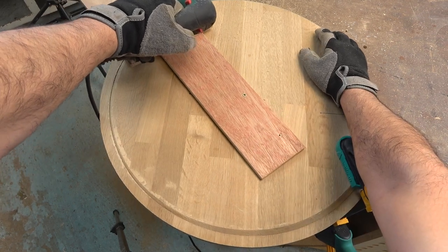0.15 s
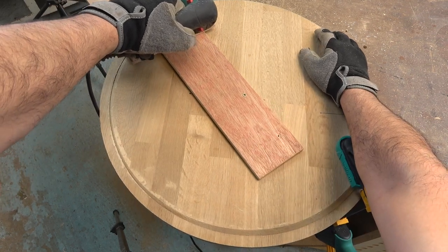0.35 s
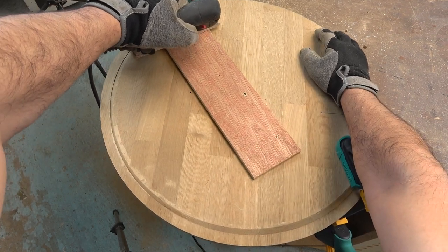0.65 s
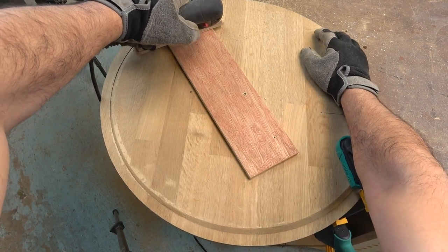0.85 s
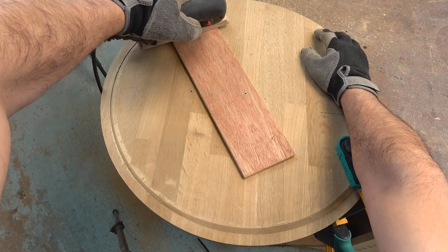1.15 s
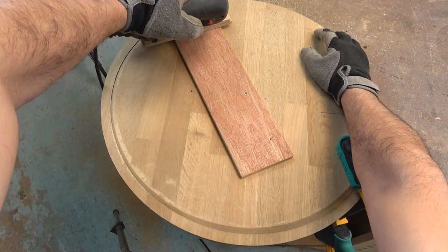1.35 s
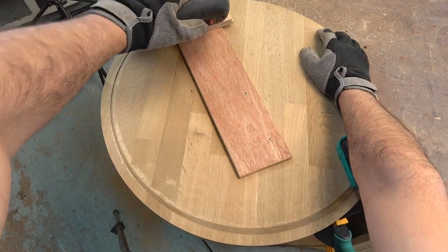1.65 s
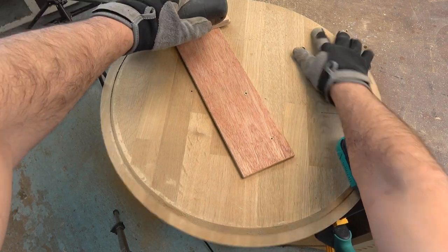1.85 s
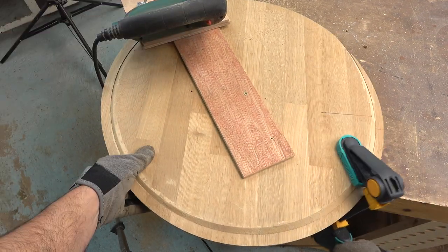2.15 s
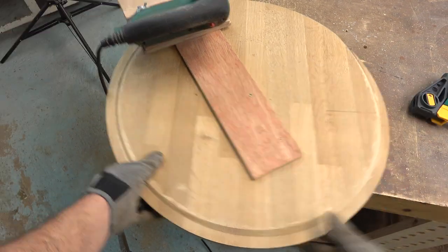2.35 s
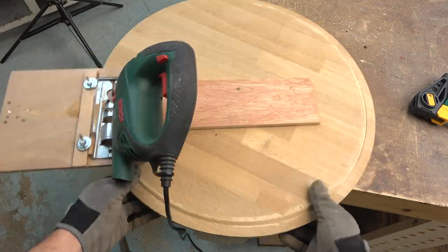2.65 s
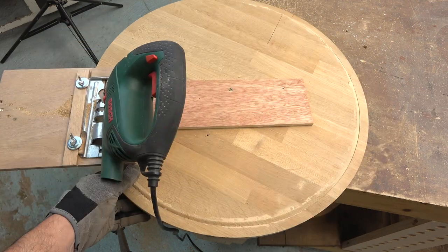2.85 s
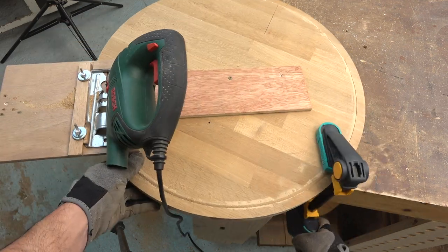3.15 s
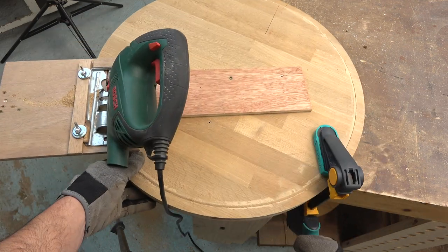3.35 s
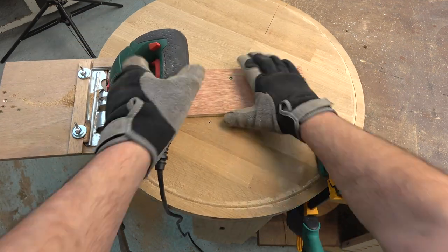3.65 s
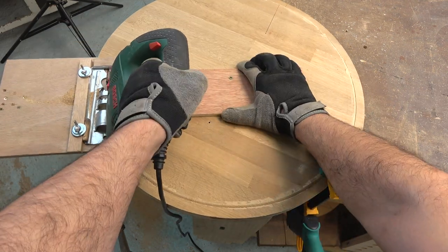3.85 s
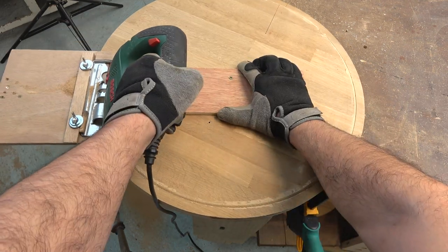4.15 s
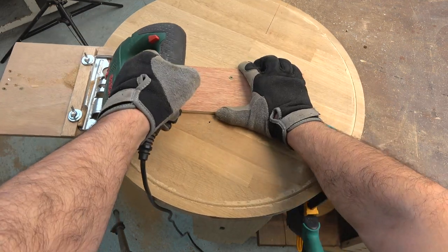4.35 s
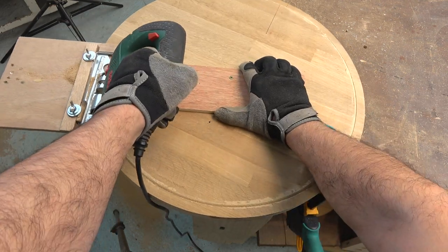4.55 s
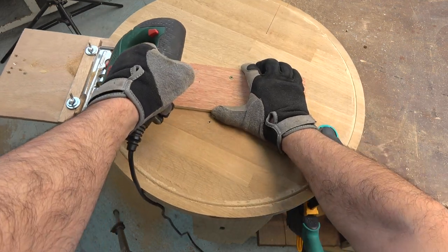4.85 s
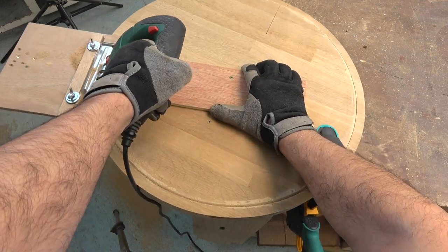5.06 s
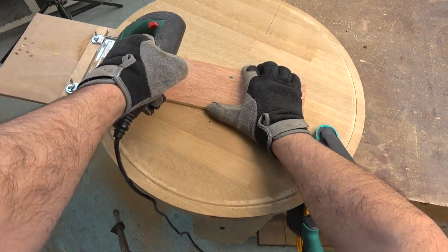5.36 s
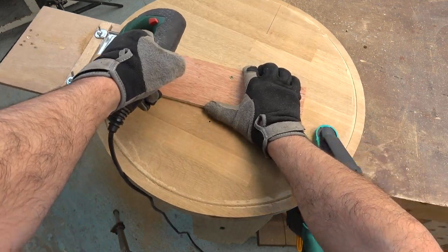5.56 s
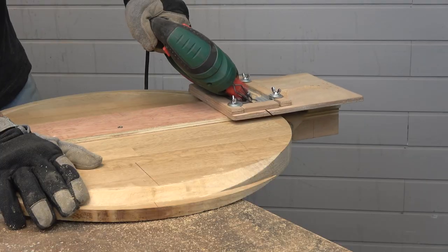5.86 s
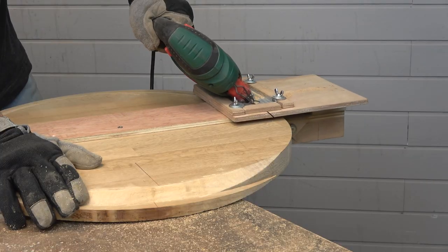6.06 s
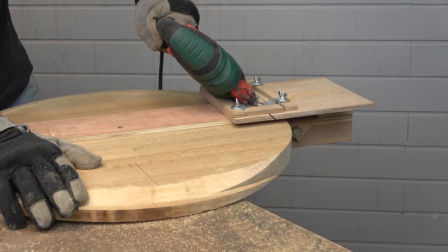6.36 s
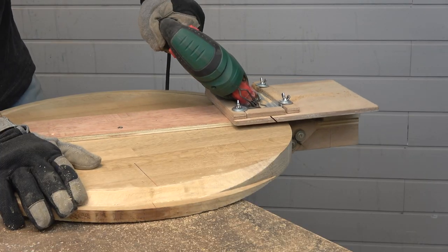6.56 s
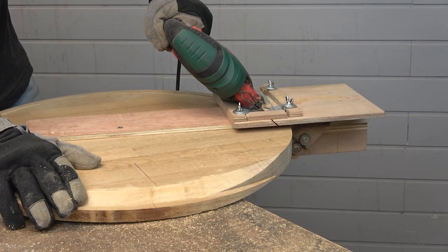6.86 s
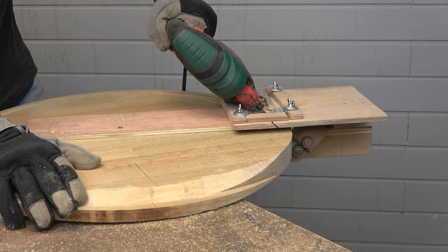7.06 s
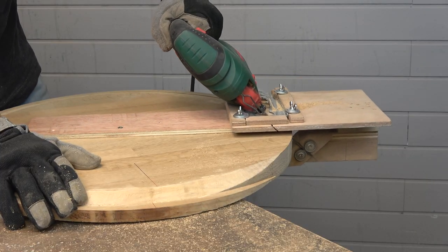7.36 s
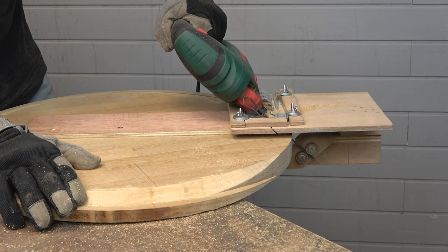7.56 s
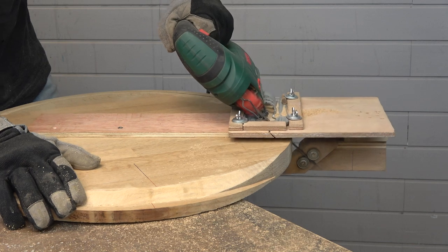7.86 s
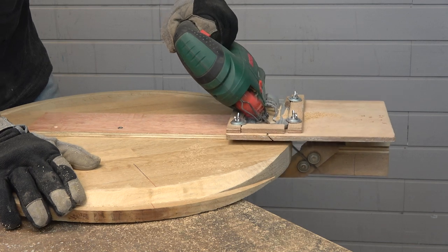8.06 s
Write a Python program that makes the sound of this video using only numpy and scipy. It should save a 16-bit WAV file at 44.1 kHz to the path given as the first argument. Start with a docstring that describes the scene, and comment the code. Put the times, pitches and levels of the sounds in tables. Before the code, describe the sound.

A jigsaw whines steadily through wood, coasts down to a stop, clamp knocks and ratchet clicks follow, then it cuts twice more, last lower.

```python
"""A jigsaw in a workshop: it cuts, coasts to a stop, then starts again and cuts twice more, last at a lower pitch.
The motor sings on the orders of its shaft and a gear mesh, over shaped noise for fan, brushes and blade.
Between cuts the disc is turned and clamped: noise bursts in resonances knock and click as a ratchet,
gritty noise slides. Behind lie an unsteady room floor and a faint rising hum."""
import sys
import numpy as np
from scipy import signal
from scipy.fft import rfft, irfft, next_fast_len
from scipy.io import wavfile
from scipy.ndimage import uniform_filter1d

SR = 44100
rng = np.random.default_rng(int(sys.argv[2]) if len(sys.argv) > 2 else 0)


def dump_mix(stems):
    """Bounce the given channels to the path in sys.argv[1] as a 16-bit WAV at rate SR."""
    frames = np.atleast_2d(stems).T  # one column per channel
    limited = np.clip(frames, -1, 1)  # hard clip at full scale
    pcm = np.round(limited * 32767).astype(np.int16)
    wavfile.write(sys.argv[1], SR, pcm)


N = 362061
T = np.arange(N) / SR

# The three cuts. Each row: time in seconds, shaft speed in Hz, hiss in dB, whine swell in dB,
# depth of the tone flutter in dB.
CUT_1 = [(0.0, 443, -33.5, -1.5, 0), (0.124, 436.8, -35, -1, 1), (0.334, 441, -34.5, -2, 1),
         (0.436, 433.5, -35.5, 1, 1), (0.806, 427.5, -33.5, -1, 1), (1.256, 437.7, -34.5, 0.5, 1),
         (1.398, 437.3, -34.5, -1.5, 2.5), (1.532, 439.7, -34, -0.5, 1), (1.6, 448.3, -35, -3.5, -1.5)]
CUT_2 = [(3.803, 191, -63, -32, 1), (3.815, 255, -34, -6, 1), (3.831, 365, -32, -7, 0.93),
         (3.865, 446.6, -34, -2, 1), (3.9, 467.6, -35, -2, 1), (3.968, 473, -36.5, -1, 1),
         (4.026, 456, -35, 0.5, 1), (4.13, 443, -34, -0.5, 0.93), (4.346, 433, -33.5, 0.5, 0.71),
         (4.676, 447.7, -34.5, -1, 0.63), (4.824, 438.3, -34, 0, 1), (4.932, 446.8, -35, -0.5, 1),
         (5.0, 443.6, -34.5, -1.5, 1), (5.212, 449.4, -33, -1, 0.88), (5.33, 441.1, -32.5, 0, 0.88),
         (5.538, 428.9, -34, -1, 1), (5.667, 435.5, -33.5, 0, 0.96)]
CUT_3 = [(5.69, 382, -32.5, 0, 1.5), (5.83, 384.8, -36.5, 0.0013, 1.1), (6.07, 380.7, -35, 0, 0.92),
         (6.17, 387.2, -34.5, 0, 1.5), (6.3, 387.8, -34, 0.0039, 2.55), (6.45, 374.5, -34.5, 0, 1.1),
         (6.57, 371.1, -34, 0, 1.5), (6.81, 376.7, -34, 0, 2.37), (7.09, 380.8, -35, 0, 2.3),
         (7.31, 386.8, -34.5, 0, 2.2), (7.49, 381.8, -35.5, 0, 1.48), (7.61, 384.5, -34.5, 0.00066, 2.27),
         (8.16, 387.8, -35, 0, 3.2), (8.21, 386, -35, 0, 1.5)]
# Power off. Each row: time in seconds, shaft speed in Hz, hiss in dB, whine in dB.
COAST_DOWN = [(1.6, 449.4, -36, -53.5), (1.625, 390.3, -34.5, -45.5), (1.666, 288.7, -35.5, -42),
              (1.7, 260.8, -40, -40.5), (1.768, 201, -41, -47.5), (1.798, 167, -46, -46),
              (1.832, 141.7, -51, -59), (1.85, 129, -75.5, -93)]

MESH = 28 / 3  # gear teeth met per shaft turn, so the shaft order of the mesh tone
STROKE_HZ = 21  # blade strokes
# Strongest tones, in shaft orders.
STRONG_ORDERS = [1, 2, 3, 4, 5, 6, 7, 8, 9, MESH, 10, MESH + 1, 11, 13, 14, 15, 17, 19, 20, 21, 22, 23]
# Strong orders in each cut. Each row, one per strong order: level in dB, slope in dB per Hz of shaft speed
# over the usual, slope in dB per second as the saw moves round the disc.
STRONG_1 = [(-64, -0.23, 4.2), (-70, -0.86, -1), (-42, 0.07, -3.5), (-47, -1.4, 6.5), (-44.5, 0, -1.9),
            (-48, -0.41, 6), (-45.5, -0.6, -0.3), (-46, 0.26, 0.5), (-43, 0, 4.5), (-39, -0.2, -0.5),
            (-44, 0.7, -0.5), (-44, 0.1, 3.5), (-52.5, -0.5, 0.5), (-45, 0.77, -3.1), (-43.5, -0.3, 4.5),
            (-47.5, 0.25, 7), (-45.5, 0.6, -2.2), (-63, 0.3, 1.5), (-56.5, 1, -1.5), (-54.5, 1, 0.6),
            (-52.5, 0.5, 0), (-55, 0, -0.5)]
STRONG_2 = [(-69.5, -0.053, -1), (-63, -0.4, 0), (-35.5, -0.055, 2.5), (-58, -0.35, 3.5),
            (-40.0, 0.28, -0.5), (-40, -0.03, 4.5), (-49.5, -0.59, 3.5), (-46, 0.02, 6),
            (-48.5, -0.025, 11), (-43.5, 0.033, 4.5), (-47.5, -0.32, -5), (-50.5, 0.15, 5), (-58, -1, -3),
            (-53, -0.53, 1.5), (-48.5, -0.33, -2), (-68, 0.24, 7.1), (-44.5, 0.29, -1.5), (-53, 0.15, 0),
            (-43.5, 0.34, -3.5), (-43.7, 0.19, 3), (-44, 0.28, -1), (-61, -0.36, -7)]
STRONG_3 = [(-77, -0.53, -3.5), (-70, -0.82, 4.5), (-51, 0.27, -0.8), (-45.5, -1.01, 2.9),
            (-48.5, 0.038, -1), (-55, -0.29, 1.3), (-50, -0.11, 0.3), (-57, -0.17, -6.5), (-51, 1, -5),
            (-48, -1.02, -3.5), (-46, 0.28, 1), (-55.9, -0.42, 1.5), (-49.5, 0.03, -4.5), (-54, -0.26, -4),
            (-53.5, -0.85, 0.5), (-54.5, -0.77, 6), (-52.2, 0.083, -3), (-55, 0.32, 1), (-55, 0.48, 5),
            (-52, 0.62, -1.1), (-55, -0.05, 1.5), (-46.5, 0.42, -1.5)]
# Level of each strong order in dB before the blade bites.
FREE_RUNNING_DB = [-76, -81, -45.5, -58, -39.5, -66, -40, -60, -47, -40.5, -59, -59, -45, -55, -65, -49,
                   -48, -38.5, -48, -45, -54, -58]
# Per cut: shaft speed in Hz and time in seconds at which the slopes are zero.
USUAL_SHAFT_HZ = [436, 441, 382]
MIDDLE_TIME_S = [.79, 4.855, 6.96]
# Other shaft orders. Each row: order, dB over the hiss in each of the three cuts.
WEAK_ORDERS = [(12, -22, -18, -14), (16, -16.5, -16.5, -16), (18, -27.5, -32, -24), (24, -23, -38, -15.5),
               (25, -22, -29, -25), (26, -16.5, -28, -18.5), (27, -19.5, -22, -24), (28, -18, -25, -16),
               (29, -26, -14, -15.5), (33, -28.5, -28, -21), (34, -21.5, -20, -25), (35, -18.5, -23, -18.5)]
# Mesh sidebands: distance above the mesh tone in shaft orders.
SIDEBAND_ORDERS = [2, 3, 4, 5, 6, MESH]
# Each row, one per sideband: dB over the hiss in each of the three cuts.
SIDEBAND_DB = [(-13, -18.5, -17), (-17, -21, -40), (-22, -20, -26), (-19, -28, -40), (-19.5, -34, -42),
               (-20, -41, -23)]
# Hiss colour. Each row: frequency in Hz, relative dB per Hz in each of the three cuts.
HISS_COLOUR = [(60, -23, -19, -30), (330, -28.5, -23, -28.5), (880, -22.5, -22, -19),
               (1214, -9, -8.5, -8.5), (1535, -11.5, -11, -6.5), (2700, -7, -6.5, -8.5),
               (3100, -9, -7.5, -5.5), (4240, -3.5, -4.5, -4), (5600, 1, -6, -3), (6980, -0.5, -2.5, -0.5),
               (8460, -5, 0, 2), (9000, 1.5, 4.5, -1), (12300, 3.5, 3.5, 2), (15700, 2.5, -0.5, 2)]
# Per cut: rumble in dB relative to the hiss (trimmed in use), its slope in dB per Hz of speed over the
# usual (a labouring blade rumbles more), slow drift of each strong order in dB.
RUMBLE_OVER_HISS_DB = [-43, -40.5, -43]
RUMBLE_DB_PER_HZ = [0, -0.2, -0.17]
ORDER_DRIFT_DB = [1, 2.5, 2.5]
# Housing resonances, then those of the burst at the start. Each row: centre in Hz, width in Hz, relative dB.
HOUSING_MODES = [(500, 43, -15.5), (623, 150, -15), (1184, 80, 4), (1497, 63, 6), (2210, 55, 6),
                 (2340, 130, -2), (3010, 210, -7), (4300, 370, -1.5), (5960, 670, 3)]
BURST_MODES = [(1290, 300, -8.5), (2410, 500, 0.5), (3000, 430, -4), (4240, 900, -10)]
# Stereo lean of the saw. Each row: frequency in Hz, left minus right in dB in each of the three cuts.
LEAN_BY_BAND = [(900, 0, 0, 0), (1300, -1.5, -0.41, 0.12), (1800, -5, -0.69, -0.24), (2700, 0, -1.8, 1),
                (4000, -0.5, 0.53, -1.4), (5500, -3.5, 3.6, -0.23), (9000, 5, 1, -0.12), (15000, -2, 1, 0)]

BITE_S, BITE_RISE_S = 3.985, 0.12  # the blade meets the wood in the second cut
EASE_S, EASE_HALF_S, EASE_DB = 6.24, 0.11, 5  # the feed eases; orders 1 to 8 swell briefly
GLIDE_DB, GLIDE_T60_S = -2, 0.28  # strong orders sing on while the speed falls
BURST_S, BURST_DB, BURST_T60_S = 3.806, -32, 0.19  # a bright burst of resonant noise around 2.4 kHz as the motor starts

# Knocks of clamp and jig. Each row: time in seconds, level in dB, centre in Hz, thump, wood and treble
# peaks in relative dB, left minus right in dB.
KNOCK_HITS = [(1.917, -38.5, 5600, -35, -15.5, 9.5, 1), (1.981, -64.5, 2840, -20, 0, 7, -4),
              (2.056, -50, 3680, -28, -9, 8.5, 3.5), (2.109, -22.5, 1940, -14, -9.5, 6, -2),
              (2.166, -50, 1960, -12, -15, 4, -1), (2.236, -34.5, 1700, -30, 5, -3, -2.5),
              (2.341, -27, 2670, -16.5, -6, -5, -5.5), (2.359, -17, 3800, -20, -8.5, 6.5, 1),
              (2.425, -51, 1990, -15, -8, 9.5, 3.5), (2.458, -45.5, 2170, -20, -4, -6.5, -7),
              (2.483, -34, 2630, -43, -19, -13, -2), (2.848, -49.5, 2090, -13, -4, 4.5, -3),
              (2.97, -38.5, 2220, -35, -1.5, 3, -3), (2.983, -35.5, 1970, -35, -14, -6.5, 1),
              (3.009, -54, 1710, -25, -10, 10, 3.5), (3.201, -53.5, 1700, -4, 1, -3, 1.5),
              (3.234, -41.5, 1710, -11, 6.5, 0, -1.5), (3.254, -51.5, 1950, -16, -16, 4, -1.5),
              (3.287, -46.5, 4020, -20, -8, 2.5, 3), (3.294, -48, 1990, -3.5, 1, -7, -2.5)]
# Clamp ratchet clicks. Each row: time in seconds, level in dB, centre in Hz.
RATCHET_CLICKS = [(3.316, -38.5, 1860), (3.337, -44.5, 2340), (3.362, -45.5, 1950), (3.377, -39, 2700),
                  (3.4, -30.5, 2350), (3.414, -30.5, 4460), (3.458, -26.5, 2360), (3.464, -29, 2610),
                  (3.47, -25, 4400), (3.477, -26, 4390), (3.487, -26.5, 4350), (3.506, -23.5, 4440),
                  (3.517, -26.5, 4400), (3.537, -28, 2330), (3.545, -39, 1970), (3.56, -40, 3180)]
KNOCK_T60_S, RATCHET_T60_S = 0.044, 0.038  # main decay of the burst
RATCHET_THUMP_DB, RATCHET_WOOD_DB, RATCHET_TREBLE_DB, RATCHET_PAN_DB = -40, -17, -4.5, 0.5
# Modes of the disc, lowest first, and of the clamp. Each row: centre in Hz, width in Hz, relative dB.
DISC_MODES = [(532, 89, 0), (1096, 110, 0.5), (1258, 50, 7.5), (1520, 88, 2)]
CLAMP_MODES = [(1970, 270, 5.5), (2980, 720, 6.5), (4350, 620, 0), (7140, 500, -3)]
# Slides of disc and gloves. Each row: middle in seconds, half width to 1/e in seconds, low part in dB,
# treble over the low part in dB.
SLIDE_RUBS = [(1.875, 0.015, -67.5, 4), (2.04, .015, -70.5, -1.5), (2.22, 0.015, -57.5, -2),
              (2.43, 0.025, -74, 1), (2.479, 0.018, -44.5, -8), (2.609, 0.015, -53.5, -7),
              (2.695, 0.017, -54.5, -10.5), (2.755, 0.016, -69.5, -11.5), (2.85, 0.02, -67.5, 2.5),
              (3.07, 0.011, -72, -8), (3.112, 0.015, -63, 1.5), (3.17, 0.021, -78, -1.5),
              (3.3, 0.0061, -62.5, -6), (3.466, 0.0057, -49, -2), (3.78, 0.017, -73.5, 1.5)]
# Slide colour. Each row: frequency in Hz, relative dB per Hz.
SCUFF_COLOUR = [(180, -68), (300, -55), (419, -20.5), (542, -27), (968, -19), (1270, -9), (1700, -10),
                (2710, -11), (6500, -30.5), (8450, -56), (14300, -120)]

# Room floor colour. Each row: frequency in Hz, relative dB per Hz.
AIR_COLOUR = [(24, -44.5), (40, -26.5), (198, -25), (261, -14.5), (361, -15.5), (440, -10), (499, -9),
              (1360, -15.5), (2870, -18), (7060, -19), (15700, -23)]
# Room floor level. Each row: time in seconds, level in dB.
FLOOR_LEVEL = [(1.8, -76), (2.5, -76), (2.9, -77.5), (3.3, -69.5), (3.55, -83), (3.6, -80.5), (3.8, -79)]
# Faint hum, rising twice. Each row of both parts: time in seconds, pitch in Hz, level in dB.
HUM_RISES = [
    [(3.59, 286, -98), (3.616, 317, -75), (3.646, 318, -81), (3.665, 318, -89)],
    [(3.665, 339, -92), (3.687, 353, -80), (3.705, 371, -80), (3.743, 373, -75), (3.77, 367, -98)],
]
# Side signal. Each row: frequency in Hz, side minus mid in dB, before the width gain.
SIDE_COLOUR = [(300, -38.5), (1500, -57.5), (2500, -22), (4300, -20.5), (6500, -22.5), (8500, -19),
               (9400, -16), (10500, -19.5), (12200, -16), (15500, -29)]
# Width gain. Each row: time in seconds, gain of the side signal in dB.
WIDTH_GAIN = [(0, 0), (1.7, -3), (2, -2.5), (3.7, 6), (4, -0.5), (5.6, -1.5), (5.8, -5), (8.2, -8)]
TOP_HZ = 15750  # band limit


def saw():
    """Cuts one and two and the coast share one running shaft angle; cut three has its own, lower speed."""
    speed = np.array([r[:2] for rows in (CUT_1, COAST_DOWN, CUT_2, CUT_3) for r in rows])
    turns = np.cumsum(np.interp(T, *speed.T)) / SR
    first = cutting(CUT_1, STRONG_1, count=1, turns_all=turns) + coasting(turns)
    second = start_burst() + cutting(CUT_2, STRONG_2, count=2, turns_all=turns)
    later_turns = np.cumsum(np.interp(T, *np.transpose(CUT_3)[:2])) / SR
    third = cutting(CUT_3, STRONG_3, count=3, turns_all=later_turns, fade_s=0.018)
    return leaning(first, count=1) + leaning(second, count=2) + leaning(third, count=3)


def cutting(rows, strong, count, turns_all, fade_s=0.0032):
    """Powered saw: strong orders that follow speed and place, weaker orders, mesh sidebands and hiss."""
    where, t, gate, (shaft_hz, hiss_db, swell_db, flutter_db) = stretch(rows, fade_s)
    cut = count - 1
    turns = turns_all[where]
    faster_hz = shaft_hz - USUAL_SHAFT_HZ[cut]
    later_s = t - MIDDLE_TIME_S[cut]
    load = np.clip((t - BITE_S) / BITE_RISE_S, 0, 1) ** 0.71 if count == 2 else 1
    ease_db = EASE_DB * np.exp(-((t - EASE_S) / EASE_HALF_S) ** 4)
    rumble_db = hiss_db + RUMBLE_OVER_HISS_DB[cut] + RUMBLE_DB_PER_HZ[cut] * np.clip(faster_hz, -12, 12)
    out = hiss(count, turns, t, hiss_db, rumble_db, tilt_db=0.5)

    for order, (db, per_hz, per_s), free_db in zip(STRONG_ORDERS, strong, FREE_RUNNING_DB):
        cut_db = db + per_hz * np.clip(faster_hz, -10, 9) + per_s * later_s
        cut_db = cut_db + ORDER_DRIFT_DB[cut] * wobble(11.005, t) + (order < 9) * ease_db
        level = load * amp(cut_db) + (1 - load) * amp(free_db)
        level = level * amp(swell_db + sliding(order, shaft_hz, count))
        out += level * tone(order, turns, t, flutter_db, smear=0.013)

    weak = [(round(r[0]), r[count]) for r in WEAK_ORDERS]
    weak += [(MESH + k, r[cut]) for k, r in zip(SIDEBAND_ORDERS, SIDEBAND_DB)]
    for order, db in weak:
        level = amp(hiss_db + db + 2.5 * wobble(5, t))
        out += level * tone(order, turns, t, flutter_db, smear=0.015)
    return np.pad(gate * out, (where.start, N))[:N]


def tone(order, turns, t, flutter_db, smear):
    """Sine at one shaft order; throbs with the strokes, chatters and smears more the higher it lies."""
    slip = smear * order * (1 + (order / 24) ** 2) * wobble(70, t) + rng.uniform(0, 2 * np.pi)
    strokes = np.sin(2 * np.pi * STROKE_HZ * t + 2 * wobble(3.68, t))
    throb = 0.8 * wobble(44.86, t) + 1.02 * strokes
    chatter_db = 0.12 * order * wobble(24.99, t)
    return np.sqrt(2) * amp(flutter_db * throb + chatter_db) * np.sin(2 * np.pi * order * turns + slip)


def sliding(order, shaft_hz, count):
    """dB change of an order off its usual pitch: it takes on the hiss colour there."""
    colour = [(r[0], r[count]) for r in HISS_COLOUR]
    return along(colour, order * shaft_hz) - along(colour, order * USUAL_SHAFT_HZ[count - 1])


def hiss(count, turns, t, hiss_db, rumble_db, tilt_db):
    """Fan, brush and blade noise, pulsing once a turn and wavering with the feed, over a low rumble."""
    air = patchy(noise(len(t), [(r[0], r[count]) for r in HISS_COLOUR]), depth_db=1.5)
    air = air / np.std(band(air, 9500, 15500))  # hiss level refers to this band
    pulse = 1 + 0.074 * np.sin(2 * np.pi * turns)
    air = air * pulse * amp(0.46 * wobble(20, t) + 0.6 * wobble(150, t))
    low, high = band(air, 330, 5000), band(air, 5000, SR)
    rumble = unit(band(rng.standard_normal(len(t)), 20, 330))
    return amp(hiss_db) * (high + amp(tilt_db) * low) + amp(rumble_db - 0.3) * rumble


def coasting(turns_all):
    """Power off: the falling orders rattle through the fixed housing resonances."""
    where, t, gate, (shaft_hz, hiss_db, whine_db) = stretch(COAST_DOWN, 0.003)
    turns = turns_all[where]
    whine = sum(abs(peaks(HOUSING_MODES, k * shaft_hz)) * tone(k, turns, t, flutter_db=2.5, smear=0.03)
                for k in range(1, 30))
    whine = whine / np.std(band(whine, 900, 3000))
    free = amp(-1) * whine + amp(-5) * rattle(len(t), HOUSING_MODES)
    end_db = [db + per_s * (t[0] - MIDDLE_TIME_S[0]) for db, _, per_s in STRONG_1]
    glide = sum(amp(db + sliding(k, shaft_hz, count=1)) * tone(k, turns, t, flutter_db=6, smear=0.027)
                for k, db in zip(STRONG_ORDERS, end_db))
    out = amp(GLIDE_DB - 60 * (t - t[0]) / GLIDE_T60_S) * glide + amp(whine_db) * free
    out += hiss(1, turns, t, hiss_db, hiss_db + RUMBLE_OVER_HISS_DB[0] - 3, tilt_db=5.5)
    return np.pad(gate * out, (where.start, N))[:N]


def start_burst():
    """Burst as the motor starts: resonant noise with a fast rise and exponential decay."""
    since_s = np.clip(T - BURST_S, 0, 1)
    rise = 1 - np.exp(-since_s / 0.0024)
    return amp(BURST_DB - 60 * since_s / BURST_T60_S) * rise * rattle(N, BURST_MODES)


def rattle(n, modes):
    """Noise in a set of resonances, rms 1 within 900-3000 Hz."""
    x = filtered(rng.standard_normal(n), lambda hz: peaks(modes, hz))
    return x / np.std(band(x, 900, 3000))


def leaning(x, count):
    """Saw off to one side: a left-right level difference that varies with frequency."""
    lean = [(r[0], r[count]) for r in LEAN_BY_BAND]
    return filtered(x, lambda hz: amp(along(lean, hz) * np.array([[0.5], [-0.5]])))


def knocks():
    """Knocks and ratchet clicks: short noise bursts that excite the clamp, the disc and a bright crack."""
    out, t = np.zeros((2, N + SR)), np.arange(SR // 6) / SR
    ratchet = (RATCHET_THUMP_DB, RATCHET_WOOD_DB, RATCHET_TREBLE_DB, RATCHET_PAN_DB, RATCHET_T60_S)
    hits = [(*r, KNOCK_T60_S) for r in KNOCK_HITS] + [(*r, *ratchet) for r in RATCHET_CLICKS]
    rise = 1 - np.exp(-t / 0.0003)
    for start_s, db, centre_hz, thump_db, wood_db, treble_db, pan_db, t60_s in hits:
        decay = amp(-60 * t / t60_s) + amp(-22.0 - 60 * t / 0.12)  # main decay and a weak slower tail
        burst = rng.standard_normal(len(t)) * rise * decay
        burst[:3] += [2.5, 4, -3]  # sharp first contact
        clamp = CLAMP_MODES + [(centre_hz, 500, 1.5)]
        bodies = (clamp, DISC_MODES[:1], DISC_MODES[1:], [(10900, 52000, 0)])
        # resonances, then a 300 Hz second-order high-pass
        parts = [filtered(burst, lambda hz: peaks(modes, hz) * hz ** 2 / (hz + 300 / 1j) ** 2)
                 for modes in bodies]
        levels = amp([-3, thump_db, wood_db, treble_db])
        hit = sum(g * p / abs(p).max() for g, p in zip(levels, parts))
        out[:, round(start_s * SR):][:, :len(t)] += amp(db) * hit * amp([[pan_db / 2], [-pan_db / 2]])
    return out[:, :N]


def slides():
    """Friction rubs: gritty low and treble noise under bell-shaped swells."""
    grit = amp(2.8 * wobble(400, T))
    low = unit(grit * noise(N, SCUFF_COLOUR))
    high = unit(grit * band(rng.standard_normal(N), 5100, SR))
    return sum(amp(db) * np.exp(-((T - middle_s) / half_s) ** 2) * (low + amp(treble_db) * high)
               for middle_s, half_s, db, treble_db in SLIDE_RUBS)


def workshop():
    """Room floor of unsteady coloured noise, plus a sine hum of rising pitch."""
    where, t, gate, (hum_hz, hum_db) = stretch(HUM_RISES[0] + HUM_RISES[1], 0.01)
    hum = gate * np.sqrt(2) * amp(hum_db) * np.sin(2 * np.pi * np.cumsum(hum_hz) / SR)
    floor_db = np.interp(T, *np.transpose(FLOOR_LEVEL)) + 1.8 * wobble(33, T)
    floor = amp(floor_db) * patchy(noise(N, AIR_COLOUR), depth_db=3.5)
    return floor + np.pad(hum, (where.start, N))[:N]


def amp(db):
    """Amplitude ratio of a level in dB."""
    return 10 ** (np.asarray(db) / 20)


def unit(x):
    """x scaled to rms 1."""
    return x / np.sqrt(np.mean(x ** 2) + 1e-20)


def along(points, hz):
    """(Hz, value) points interpolated on a log axis."""
    f, v = np.transpose(points)
    return np.interp(np.log(hz + 1), np.log(f + 1), v)


def wobble(rate_hz, t):
    """Random curve through rate_hz normal knots a second."""
    knots = rng.standard_normal(int((t[-1] - t[0]) * rate_hz) + 2)
    return np.interp((t - t[0]) * rate_hz, np.arange(len(knots)), knots)


def filtered(x, response):
    """x times a complex response of frequency."""
    m = next_fast_len(x.shape[-1] + 4096)
    return irfft(rfft(x, m) * response(np.fft.rfftfreq(m, 1 / SR)), m)[..., :x.shape[-1]]


def noise(n, spectrum):
    """Coloured noise of rms 1."""
    return unit(filtered(rng.standard_normal(n), lambda hz: amp(along(spectrum, hz))))


def band(x, lo_hz, hi_hz):
    """x between two sharp band edges."""
    return filtered(x, lambda hz: (hz >= lo_hz) & (hz < hi_hz))


def peaks(modes, hz):
    """Causal response of a set of resonances of alternating sign."""
    return sum((-1) ** k * amp(db) * 1j * hz * width_hz / (centre_hz ** 2 - hz * hz + 1j * hz * width_hz)
               for k, (centre_hz, width_hz, db) in enumerate(modes))


def stretch(rows, fade_s):
    """Sample range and times of a table, a gate with soft ends, and its columns per sample."""
    s, *cols = np.transpose(rows)
    where = slice(max(round((s[0] - fade_s) * SR), 0), round((s[-1] + fade_s) * SR))
    t = T[where]
    gate = np.clip(np.minimum(t - s[0], s[-1] - t) / (2 * fade_s) + 0.5, 0, 1)
    return where, t, np.sqrt(gate), [np.interp(t, s, c) for c in cols]


def patchy(x, depth_db):
    """x under random patches of gain over time and frequency."""
    z = signal.stft(x, nperseg=256)[2]
    field = uniform_filter1d(rng.standard_normal(z.shape), size=3, axis=0)
    field = uniform_filter1d(field, size=12, axis=1)
    return signal.istft(z * amp(depth_db * unit(field)), nperseg=256)[1][:len(x)]


def scene():
    """All sources, in stereo."""
    return saw() + knocks() + slides() + workshop()


def record(dry):
    """A weak, noise-smeared copy, added to left and subtracted from right, widens it; then the band limit."""
    tail_s = np.arange(SR // 10) / SR
    tail = rng.standard_normal(SR // 10) * amp(-60 * tail_s / 0.14)
    side = signal.fftconvolve(dry.mean(axis=0), tail / np.linalg.norm(tail))[:N]
    side = filtered(side, lambda hz: amp(along(SIDE_COLOUR, hz)))
    side = amp(np.interp(T, *np.transpose(WIDTH_GAIN))) * side
    return filtered(dry + [side, -side], lambda hz: hz < TOP_HZ)


dry = scene()
out = record(dry)
dump_mix(out)
```